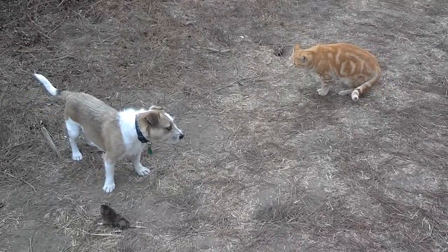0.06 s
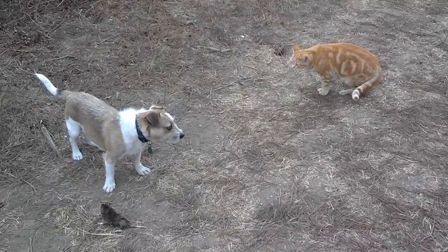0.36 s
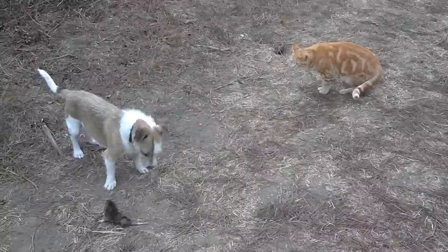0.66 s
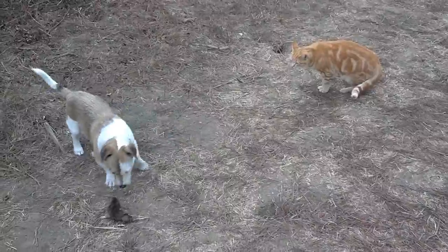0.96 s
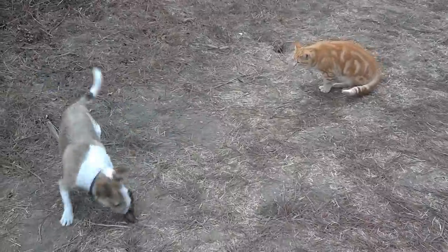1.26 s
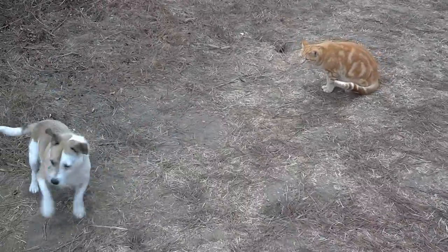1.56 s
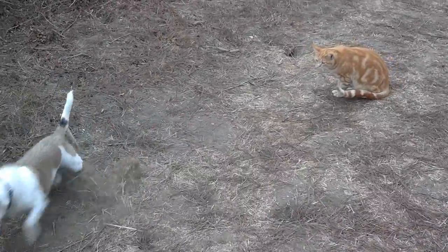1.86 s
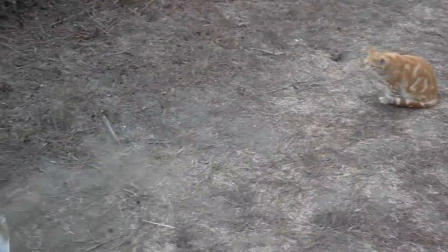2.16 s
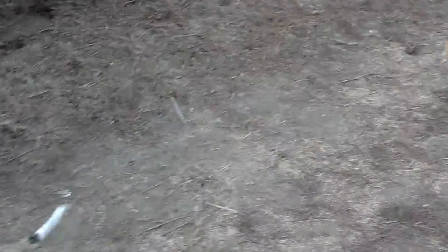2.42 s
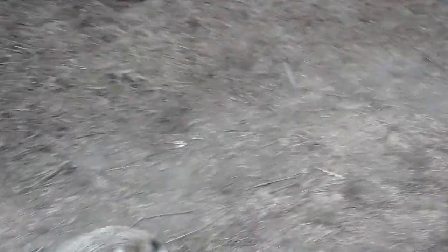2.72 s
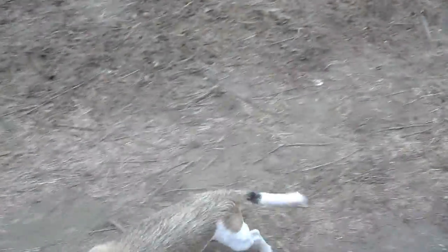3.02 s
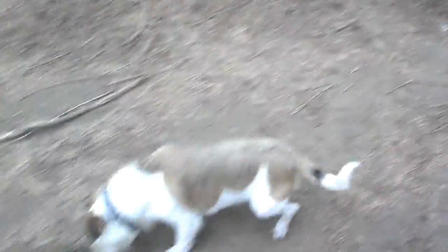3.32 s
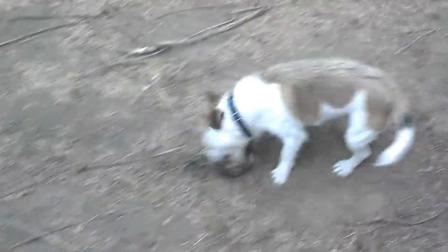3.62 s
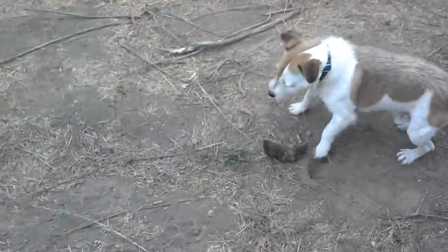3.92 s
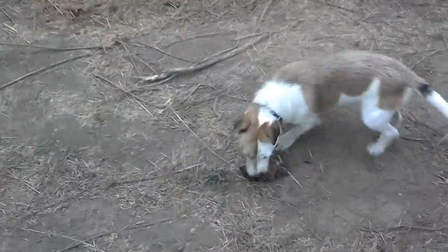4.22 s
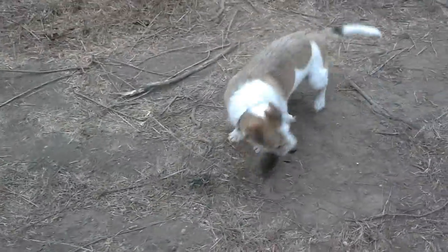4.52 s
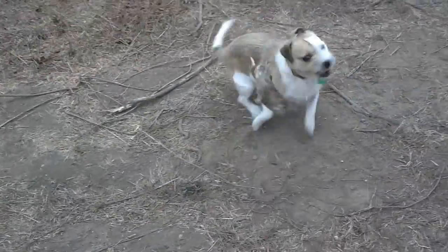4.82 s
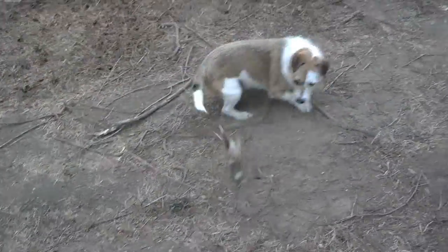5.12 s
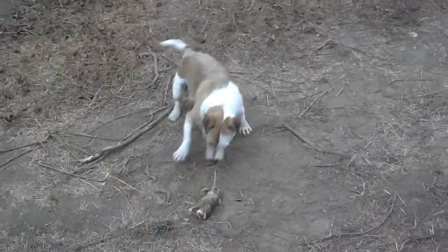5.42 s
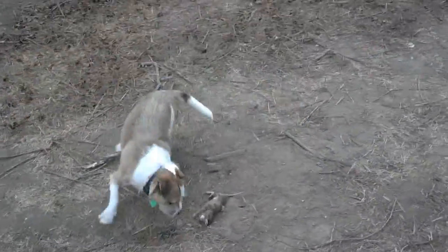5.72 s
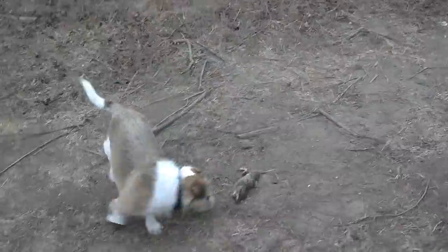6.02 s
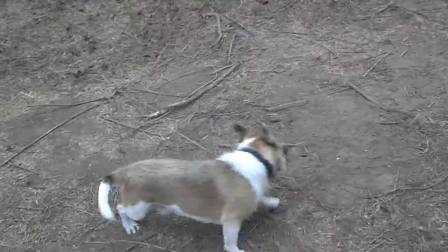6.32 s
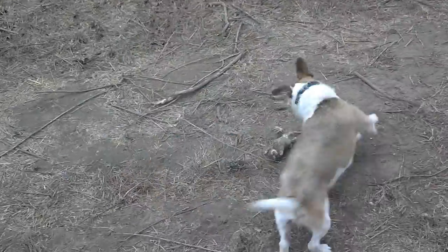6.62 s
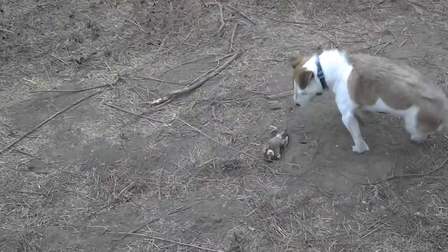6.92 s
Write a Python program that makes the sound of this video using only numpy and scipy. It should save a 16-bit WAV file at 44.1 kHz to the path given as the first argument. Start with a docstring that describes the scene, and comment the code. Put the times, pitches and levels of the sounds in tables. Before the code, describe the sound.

Paws thump and scrape through grit as collar tags clink, and a small dog squeals once in a light breeze.

```python
"""A small dog pounces on a gopher on dry dirt in an open yard, a few metres away.
Its paws thud on packed earth and scrape through grit, the tag and buckle on its collar clack and ring
as they collide, and its vocal folds give one short high yelp when it is nipped. Low rumbling bumps
come with the thuds. Behind lie a far bird, faint whines, a light breeze and a soft outdoor rush that
dips after the sharpest sounds and creeps back."""
import sys
import numpy as np
from scipy import signal
from scipy.fft import rfft, irfft, next_fast_len
from scipy.io import wavfile
from scipy.ndimage import uniform_filter1d

SR = 44100
rng = np.random.default_rng(int(sys.argv[2]) if len(sys.argv) > 2 else 0)


def output_pcm(signal):
    """Save a mono or channel-first signal as 16-bit PCM at the path in sys.argv[1].

    Samples are clipped to [-1, 1] before scaling.
    """
    pcm = np.clip(np.atleast_2d(signal).T, -1, 1) * 32767
    wavfile.write(sys.argv[1], SR, np.round(pcm).astype(np.int16))


N = 311787
TIME = np.arange(N) / SR


def undb(db):
    """Decibels to amplitude ratio."""
    return 10 ** (np.asarray(db) / 20)


def unit(x):
    """Normalisation to rms 1."""
    return x / np.sqrt(np.mean(x ** 2) + 1e-18)


def gain_at(hz, spectrum):
    """Frequency response: (frequency_hz, gain_db) points joined on a logarithmic frequency axis."""
    points_hz, db = np.transpose(spectrum)
    return undb(np.interp(np.log(hz + 1), np.log(points_hz), db))


def colour(x, spectrum):
    """Spectral shaping by a zero-phase filter, scaled to rms 1."""
    size = next_fast_len(len(x))
    response = gain_at(np.fft.rfftfreq(size, 1 / SR), spectrum)
    return unit(irfft(rfft(x, size) * response, size)[:len(x)])


def walk(rate, size=N):
    """Smooth random modulation of rms 1, with about rate turns a second."""
    hold = max(int(SR / rate), 1)
    steps = np.repeat(rng.standard_normal(size // hold + 1), hold)
    return unit(uniform_filter1d(uniform_filter1d(steps, hold), hold)[:size])


def add(track, start_s, sound):
    """Superposition of a sound on a track."""
    i = int(start_s * SR)
    part, i = sound[max(-i, 0):max(N - i, 0)], max(i, 0)
    track[i:i + len(part)] += part


def swell(width_s):
    """Gaussian envelope: times around its centre, and the bell over them."""
    t = np.arange(-2 * width_s, 2 * width_s, 1 / SR)
    return t, np.exp(-2 * (t / width_s) ** 2)


def fade(t, t60):
    """Exponential decay, 60 dB in t60 seconds."""
    return np.exp(-np.log(1000) * t / t60)


def grains(size, rate, spread_db):
    """Shot noise: sparse clicks of very unequal size, about rate a second."""
    sizes = undb(spread_db * np.minimum(rng.exponential(size=size), 4))
    return (rng.random(size) < rate / SR) * sizes * rng.choice([-1, 1], size)


# dips of the background: start_s, depth_db
DIPS = [(2.118, -9.5), (3.762, -10), (4.81, -24), (6.2, -15), (6.978, -20.5)]
def dips(drop_s=.02, recovery_db_per_s=10.5):
    """Gain envelope in dB: the background drops abruptly, then climbs back at a steady rate."""
    each = [np.clip((TIME - s) / drop_s, 0, 1) * np.minimum(db + recovery_db_per_s * (TIME - s), 0)
            for s, db in DIPS]
    return np.min(each, axis=0)


# spectrum of the outdoor rush: frequency_hz, gain_db
RUSH_SPECTRUM = [(20, -42.5), (60, -3.5), (120, 9), (160, 3.5), (215, 2), (280, -3.5), (420, -9.5),
                 (850, -8), (1300, -16), (1900, -17.5), (2600, -24.5), (4000, -32), (7000, -38),
                 (11000, -40), (15500, -33.5)]
def outdoor_rush(level_db=-43, flicker_db=.93):
    """Broadband noise, strongest in the bass, with slight random amplitude modulation."""
    envelope = undb(level_db + dips() + flicker_db * walk(11))
    return envelope * colour(rng.standard_normal(N), RUSH_SPECTRUM)


# spectrum of the low rumble: frequency_hz, gain_db
RUMBLE_SPECTRUM = [(20, -26.5), (50, -14.5), (85, -1), (122, 5), (200, -9.5), (320, -29), (600, -36.5),
                   (1500, -58.5)]
def rumble(bump_envelope, breeze_db=-52, gust_db=3.5):
    """Amplitude-modulated bass noise: a light breeze, with short rumbling bumps on top."""
    breeze = undb(breeze_db + dips() + gust_db * walk(15))
    return (breeze + bump_envelope) * colour(rng.standard_normal(N), RUMBLE_SPECTRUM)


# faint distant hums and whines: centre_s, pitch_hz, level_db, width_s
WHINES = [(.8, 215, -56, 1.3), (4.35, 1075, -60, .2), (6.7, 965, -66, .5)]
# a far bird's falling calls: centre_s, pitch_hz, level_db, width_s
BIRD_CALLS = [(.38, 1900, -56.5, .07), (.79, 1880, -58, .07), (.9, 1850, -59, .07), (1.32, 1820, -54, .09),
              (1.8, 1850, -56, .08), (2.45, 1800, -62, .07)]
def far_tones(rows, fall_per_s, blur_hz):
    """Multipath propagation smears each distant falling tone into a narrow band of noise."""
    out = np.zeros(N)
    for s, hz, db, width in rows:
        t, bell = swell(width)
        phase = 2 * np.pi * np.cumsum(hz * np.exp(-fall_per_s * t)) / SR
        smeared = walk(blur_hz, len(t)) * np.sin(phase) + walk(blur_hz, len(t)) * np.cos(phase)
        add(out, s + t[0], undb(db) * bell * smeared)
    return out


# spectrum of struck earth: frequency_hz, gain_db
EARTH_SPECTRUM = [(40, -33.5), (100, 0), (170, 6.5), (320, 0.5), (500, -15), (1200, -17.5), (3000, -48)]
# thuds of the scuffle, most with a low rumbling bump: start_s, thud_db, bump_db
SCUFFLE = [(0.381, -54, -41), (1.83, -48, -65), (2.181, -55, -68), (2.425, -50, -42), (2.836, -40, -18),
           (2.873, -44.5, -39), (3.045, -40, -44), (3.217, -40, -60), (3.259, -42, -63),
           (3.41, -45.5, -26.5), (3.515, -41, -32), (3.761, -52, -32.5), (3.866, -47.5, -37),
           (4.63, -43.5, -36), (4.737, -46, -24), (5.274, -51, -85), (5.669, -65.5, -44.5),
           (5.749, -45.5, -38), (5.877, -40.5, -30.5), (5.965, -45, -31), (6.0, -47.5, -34),
           (6.13, -52, -40.5), (6.373, -53.5, -40), (6.819, -50, -35)]
def paw_thuds(gain_db=3, attack_s=.0036, t60=.12):
    """Damped impact: soft pads on packed earth excite mainly low frequencies, which die quickly."""
    out, t = np.zeros(N), np.arange(SR // 4) / SR
    push = fade(t, t60) * np.minimum(t / attack_s, 1)
    for s, db, _ in SCUFFLE:
        add(out, s, undb(db + gain_db) * colour(rng.standard_normal(len(t)), EARTH_SPECTRUM) * push)
    return out


def bumps(gain_db=-1, lag_s=.018, width_s=.04):
    """Amplitude envelope of the low rumbling bumps: each peaks just after its thud."""
    envelope = np.zeros(N)
    t, bell = swell(width_s)
    for s, _, db in SCUFFLE:
        add(envelope, s + lag_s + t[0], undb(db + gain_db) * bell)
    return envelope


# spectra of grit and of snapping straw: frequency_hz, gain_db
GRIT_SPECTRUM = [(200, -8.5), (700, 0.5), (1800, 5.5), (3000, 3), (4300, -0.5), (6000, -6), (10000, -3),
                 (15500, -9.5)]
STRAW_SPECTRUM = [(800, -14), (2000, -1.5), (4000, -7.5), (9500, 1.5), (15500, 3.5)]
# paws dragging through grit and dry grass: centre_s, level_db, width_s
DRAGS = [(1.45, -68.5, 0.65), (1.87, -59.5, 0.2), (2.5, -66.5, 1), (3.2, -57, 0.41), (3.675, -60, 0.28),
         (4.19, -69, 0.48), (4.58, -54.5, 0.068), (4.985, -74, 1), (5.89, -54, 0.076), (6.39, -69, .4),
         (6.845, -60, 0.24)]
def paw_scrapes(grit_db=3, straw_db=-3):
    """Granular friction and brittle fracture: grit crackles and dry straws tick under the paws."""
    drag = np.zeros(N)
    for s, db, width in DRAGS:
        t, bell = swell(width)
        add(drag, s + t[0], undb(db) * bell)
    crackle = colour(grains(N, rate=2700, spread_db=2.5) * undb(3.2 * walk(50)), GRIT_SPECTRUM)
    snap = fade(np.arange(SR // 100) / SR, t60=.009)
    bursts = signal.fftconvolve(np.abs(grains(N, rate=150, spread_db=1.2)), snap)[:N]
    straws = colour(bursts * rng.standard_normal(N), STRAW_SPECTRUM)
    return (undb(grit_db) * crackle + undb(straw_db) * straws) * drag


# spectrum of a short burst around its peak: frequency_ratio, gain_db
BURST_SPECTRUM = [(.125, -15.5), (.7, -7.5), (1, -2.5), (1.5, -11), (4.999, -17)]
# short skids, snaps and small high ticks: centre_s, level_db, width_s, peak_hz
SHORT_BURSTS = [(1.736, -51, 0.019, 3970), (1.823, -42, 0.0049, 1550), (1.855, -45, 0.016, 2960),
                (1.899, -45, 0.0096, 3730), (2.074, -49.5, 0.035, 2500), (2.2, -51.5, 0.013, 9050),
                (2.365, -47, 0.021, 4600), (2.436, -48.5, 0.0034, 13000), (2.673, -52.5, 0.036, 4100),
                (3.053, -42.5, .008, 2460), (3.086, -49, 0.011, 3950), (3.148, -48, .004, 14000),
                (4.691, -41.5, 0.0078, 5500), (4.908, -46, .005, 2000), (4.972, -53, 0.0087, 3000),
                (5.876, -52, .06, 3850), (6.239, -64.5, .012, 3500), (6.888, -49, .007, 2500)]
def short_bursts():
    """Band-shaped transients: brief clicks and hiss, heard as skids, snaps and small high ticks."""
    out = np.zeros(N)
    for s, db, width, hz in SHORT_BURSTS:
        t, bell = swell(width)
        band = [(hz * ratio, gain) for ratio, gain in BURST_SPECTRUM]
        crackle = grains(len(t), rate=2200, spread_db=4.5) + .45 * rng.standard_normal(len(t))
        add(out, s + t[0], undb(db) * bell * colour(crackle, band))
    return out


def split(share):
    """Constant-power crossfade: two gains, from all in the first (0) to all in the second (1)."""
    angle = np.clip(share, 0, 1) * np.pi / 2
    return np.cos(angle), np.sin(angle)


def ring(modes, t, mistune, choke, scatter_db=3.5, attack_s=.002):
    """Modal vibration: metal struck at a random spot shares each blow differently among its modes."""
    hz, db, t60 = np.transpose(modes)[:, :, None]
    size, detune, start_phase, damping = rng.standard_normal((4, len(modes), 1))
    gain = undb(db + scatter_db * size)
    # fur and strap damp each mode differently from blow to blow
    t60 = t60 * np.exp(.35 * np.minimum(damping, 1))
    # touching its neighbours, the piece loses most of its ring at once and wavers in level and pitch
    decay = .3 * fade(t, t60) + .7 * fade(t, t60 * choke)
    waver = undb(3 * np.array([walk(130, len(t)) for _ in modes]))
    pitch = hz * (1 + mistune * (detune + .5 * walk(150, len(t))) * fade(t, .3))
    waves = gain * decay * waver * np.sin(2 * np.pi * (np.cumsum(pitch, axis=1) / SR + start_phase))
    return waves.sum(axis=0) * np.sqrt(2 / np.sum(gain ** 2)) * np.minimum(t / attack_s, 1)


# spectra of the dead clack, and of tag and buckle buzzing together: frequency_hz, gain_db
CLACK_SPECTRUM = [(500, -28.5), (2500, -29), (5000, -20), (7000, -18.5), (8700, -2.5), (9700, -1.5),
                  (10700, 7), (12000, -17.5), (14500, -7), (16000, -22.5)]
BUZZ_SPECTRUM = [(2000, -23), (5000, -7.5), (7000, -7.5), (10400, -7.5), (12500, -8.5), (15000, 0.5)]
# natural modes of the tag and the buckle: frequency_hz, level_db, t60_s
TAG_MODES = [(5920, -13, 0.39), (6683, -10.5, 0.11), (10520, 1, 0.2), (12170, 4.5, 0.051), (13330, -2, .1),
             (14120, -6, .1), (15170, 3, 0.12)]
BUCKLE_MODES = [(7490, -11, 0.076), (8040, -16.5, 0.055), (9100, -15, 0.03), (10920, -16.5, 0.11),
                (14850, 0.5, .11)]
def knock(freedom, buckle_share, clack_db=3, chatter_db=-15, tag_db=6, buckle_db=1, buzz_db=-7):
    """Impact of metal on metal: damped pieces clack and chatter, free ones ring and buzz."""
    t = np.arange(SR // 4) / SR
    dead, free = split(freedom)
    on_tag, on_buckle = split(buckle_share)
    contact = rng.standard_normal(len(t)) * fade(t, t60=.015)
    contact[32] += 9  # one hard contact within the brief rattle
    blow = colour(contact, CLACK_SPECTRUM) * np.sqrt(.0018 / t[-1])
    chatter = colour(grains(len(t), rate=1500, spread_db=4.5), CLACK_SPECTRUM) * fade(t, t60=.17)
    clack = undb(clack_db) * (blow + undb(chatter_db) * chatter)
    tag = undb(tag_db) * ring(TAG_MODES, t, mistune=.005, choke=.3)
    buckle = undb(buckle_db) * ring(BUCKLE_MODES, t, mistune=.007, choke=.4)
    buzz = colour(grains(len(t), rate=3600, spread_db=2), BUZZ_SPECTRUM) * fade(t, t60=.082)
    jingle = on_tag * tag + on_buckle * buckle + undb(buzz_db) * buzz
    fur_damping = fade(dead * t, t60=.27)
    return dead * clack + free * jingle * fur_damping


# collar knocks: start_s, level_db, freedom (0 dead to 1 ringing), buckle_share (0 tag to 1 buckle)
COLLAR_KNOCKS = [(1.857, -39.5, 0.78, .3), (1.902, -34.5, 0.2, .05), (1.915, -42.5, .2, .1),
                 (2.068, -36, 0.42, .4), (2.1196, -25, 0.36, 0.73), (2.331, -44, 0.74, .75),
                 (2.404, -40.5, .95, .8), (2.413, -35.5, 0.94, 0.95), (2.804, -29, 0.91, 0.9),
                 (3.168, -35.5, .85, .55), (3.222, -26.5, 0.82, .9), (3.258, -29, 0.84, .8),
                 (3.272, -33.5, .65, .86), (3.404, -43, 0.77, .8), (3.477, -36, .9, .5),
                 (3.545, -40.5, 0.78, .6), (3.585, -39.5, 0.86, .1), (3.689, -32, .5, .1),
                 (3.722, -30.5, 0.41, .1), (3.757, -28.5, .6, 0.31), (3.989, -40.5, 0.48, 0.46),
                 (3.995, -36.5, 0.16, .3), (4.087, -40, 0.87, 0.11), (4.204, -43.5, 0.67, .9),
                 (4.341, -44.5, 0.36, .35), (4.579, -33, 0.55, .05), (4.687, -37, 0.18, .18),
                 (4.902, -40.5, 0.71, .55), (4.975, -41, .55, .05), (5.178, -50, 0.62, .7),
                 (5.888, -43.5, .88, .05), (6.0, -47.5, 0.77, .05), (6.036, -50.5, 1, .05),
                 (6.122, -55, 0.69, 0.54), (6.459, -44.5, 0.8, .05), (6.543, -39.5, 0.49, .05),
                 (6.886, -33, 0.38, .1), (6.905, -36.5, 0.68, .5), (6.9779, -27, 0.058, .75)]
def collar(mean_rebound_s=.015, rebound_db=-6):
    """Inelastic collision: each knock has a softer rebound, stronger when the pieces swing freely."""
    out = np.zeros(N)
    for s, db, freedom, buckle_share in COLLAR_KNOCKS:
        add(out, s, undb(db) * knock(freedom, buckle_share))
        rebound_s = s + mean_rebound_s * (.5 + rng.random())
        add(out, rebound_s, freedom * undb(db + rebound_db) * knock(freedom, buckle_share))
    return out


# tone colour of the yelp, the peaks and dips its harmonics sweep through: frequency_hz, gain_db
YELP_SPECTRUM = [(800, 3.5), (1075, 3), (1135, -9.5), (1190, 1.5), (1900, -5), (2100, -15), (2190, 4),
                 (2440, -10.5), (3200, -11.5), (3600, -29), (4300, -30), (5500, -49), (9500, -43.5),
                 (15000, -64)]
# course of the dog's voice: time_s, pitch_hz, level_db
YELP_CONTOUR = [(4.697, 837, -55.5), (4.705, 885, -36.5), (4.716, 949, -30), (4.731, 1220, -28.5),
                (4.74, 1426, -21.5), (4.749, 1441, -30), (4.757, 1368, -24), (4.771, 1083, -15),
                (4.786, 1054, -14), (4.802, 1193, -12.5), (4.818, 1215, -10), (4.829, 1295, -10.5),
                (4.84, 1316, -10.5), (4.852, 1450, -19.5), (4.857, 1666, -22), (4.872, 1663, -36),
                (4.895, 1429, -34), (4.907, 1365, -49)]
def yelp(hoarse_s=.079, hoarse_db_per_octave=3.5, flutter=.004, roughness=.07):
    """Source and filter: a squeal starts hoarse; its harmonics sweep through spectral peaks and dips."""
    times, pitch_hz, level_db = np.transpose(YELP_CONTOUR)
    start, end = times[0], times[-1]
    hoarse = np.interp(TIME, [start + hoarse_s / 2, start + hoarse_s], [1, 0])
    hz = np.interp(TIME, times, pitch_hz) * (1 + flutter * (1 + 5 * hoarse) * walk(300))
    phase = 2 * np.pi * np.cumsum(hz) / SR
    effort = undb(np.interp(TIME, times, level_db))
    tilt_db = hoarse_db_per_octave * hoarse
    voice = effort * sum(gain_at(k * hz, YELP_SPECTRUM) * undb(tilt_db * np.log2(k)) * np.sin(k * phase)
                         for k in range(1, 10))
    breath_spectrum = [(300, -25), (1000, -7.5), (2400, 6.5), (4500, -13.5), (9000, -16.5)]
    # air rushes through the throat once a cycle
    rasp = colour(rng.standard_normal(N), breath_spectrum) * (1 + np.cos(phase))
    airflow = (undb(-40) + 4 * hoarse * undb(-43)) * np.sqrt(effort)
    shimmer = 1 + roughness * (1.7 + 2 * hoarse) * walk(400)
    gate = uniform_filter1d(1. * ((TIME > start) & (TIME < end)), size=200)
    return gate * (np.sqrt(2) * voice * shimmer + airflow * rasp)


def yard(x, fence_db=-45, fence_t60=.94, build_s=.083, ground_db=-33, ground_t60=.27):
    """Reflection: a little scatter from the ground nearby and a weak dull tail from far fences."""
    t = np.arange(SR) / SR
    dull = colour(rng.standard_normal(SR), [(200, .5), (1200, -13.5), (2500, -15), (10000, -13.5)])
    fences = undb(fence_db) * unit(dull * fade(t, fence_t60) * np.minimum(t / build_s, 1))
    ground = undb(ground_db) * unit(rng.standard_normal(SR) * fade(t, ground_t60))
    return signal.fftconvolve(x, (fences + ground) / np.sqrt(SR))[:N]


def ports(mid, side, narrow, lag_samples=16):
    """Phase difference of two microphone ports: opposed in the bass, alike near 1.4 kHz, lag above."""
    size = next_fast_len(N)
    hz = np.fft.rfftfreq(size, 1 / SR)
    half_phase = np.pi * (hz * lag_samples / SR - .5)
    # the phase difference is narrowed in the lower middle range
    half_phase = np.maximum(half_phase, half_phase * np.interp(hz, [130, 420], [1, narrow]))
    common = irfft(rfft(mid, size) * np.cos(half_phase), size)[:N]
    opposed = irfft(rfft(side, size) * 1j * np.sin(half_phase), size)[:N]
    return np.array([common + opposed, common - opposed])


def scene(rush_spread=.8, rumble_bias=-.081):
    """Superposition: dog in front, rush all round, rumble in opposite phase in the two channels."""
    dog = yelp() + collar() + paw_scrapes() + short_bursts()
    bird = far_tones(BIRD_CALLS, fall_per_s=2.1, blur_hz=340)
    whines = far_tones(WHINES, fall_per_s=.01, blur_hz=23.83)
    direct = dog + bird + whines
    ahead, around = outdoor_rush(), outdoor_rush()
    wide = rush_spread * around + np.sqrt(1 - rush_spread ** 2) * ahead
    front = ports(direct + yard(dog), direct + yard(dog), narrow=.45)
    background = ports(ahead, wide, narrow=.62)
    rumble_gains = np.array([[rumble_bias + 1], [rumble_bias - 1]])
    return front + background + paw_thuds() + rumble(bumps()) * rumble_gains


def record(dry, cutoff_hz=15900):
    """Band limiting: a steep low-pass filter removes the highest treble."""
    return signal.sosfilt(signal.ellip(10, .2, 70, cutoff_hz, fs=SR, output="sos"), dry)


dry = scene()
out = record(dry)
output_pcm(out)
```